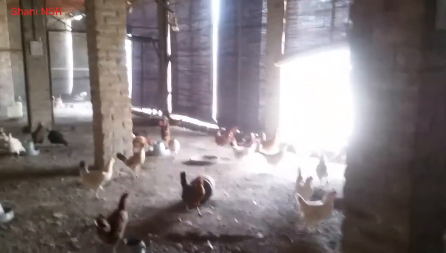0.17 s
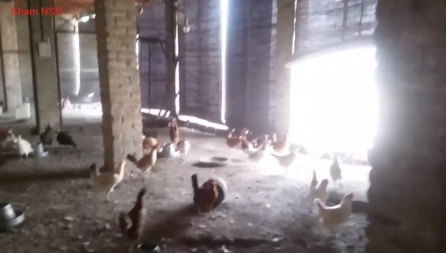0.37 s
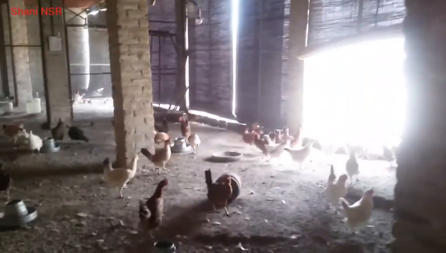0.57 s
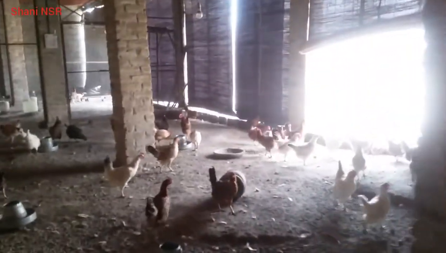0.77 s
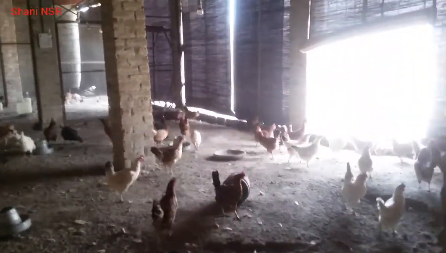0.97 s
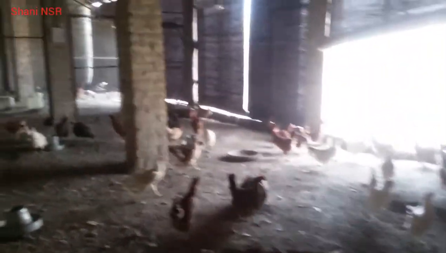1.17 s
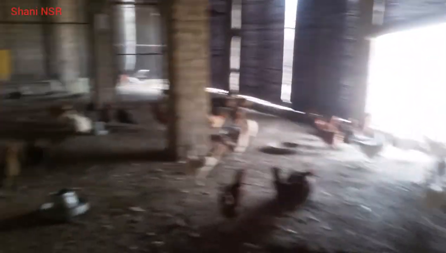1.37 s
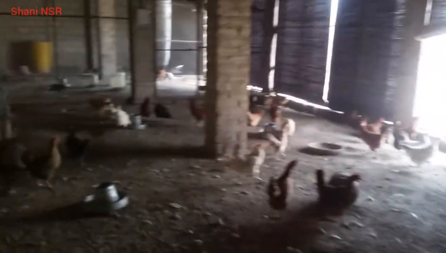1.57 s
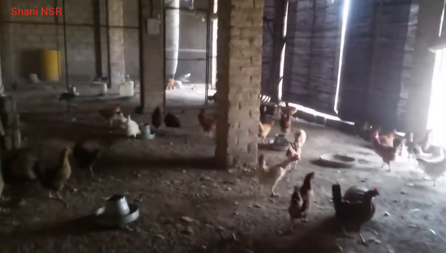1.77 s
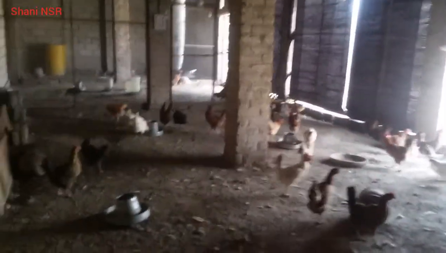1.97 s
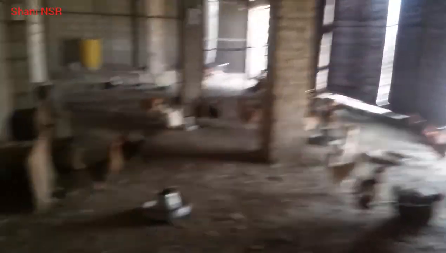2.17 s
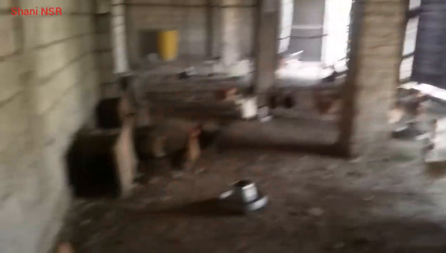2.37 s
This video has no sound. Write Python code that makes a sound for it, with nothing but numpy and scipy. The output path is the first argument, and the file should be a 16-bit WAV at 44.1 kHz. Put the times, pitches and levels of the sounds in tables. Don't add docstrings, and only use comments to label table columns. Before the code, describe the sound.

Hens cluck in short bunches and croon softly at a distance in an echoing brick shed, with faint pecks and low fan hum; then a close hen squawks, wings thump, and a second squawk is cut off.

```python
import sys
import numpy as np
from scipy import signal
from scipy.fft import rfft, irfft
from scipy.io import wavfile
from scipy.ndimage import uniform_filter1d

SR = 44100
rng = np.random.default_rng(int(sys.argv[2]) if len(sys.argv) > 2 else 0)


def amplitude_ratio(level_db):
    exponent = np.asarray(level_db, float) / 20
    return 10 ** exponent


def store_wav(level_fs):
    pcm = np.round(np.clip(np.atleast_2d(level_fs), -1, 1) * 32767)
    wavfile.write(sys.argv[1], SR, pcm.T.astype(np.int16))


N = 107207
PORT_LAG_S = 0.00017
FAR_T60_S = 0.33


def curve(table):
    p = np.array(table, float)
    return amplitude_ratio(np.interp(np.log(np.fft.rfftfreq(N, 1 / SR) + 1), np.log(p[:, 0] + 1), p[:, 1]))


def unit(x):
    return x / np.sqrt(np.mean(x ** 2))


def shaped(noise, table):
    return unit(irfft(rfft(noise) * curve(table), N))


def band(x, hz, width_hz):
    sos = signal.butter(2, [hz - width_hz / 2, hz + width_hz / 2], "band", fs=SR, output="sos")
    return signal.sosfilt(sos, x)


def walk(rate_hz):
    k = int(SR / rate_hz)
    steps = np.repeat(rng.standard_normal(N // k + 1), k)
    return unit(uniform_filter1d(uniform_filter1d(steps, k), k)[:N])


def stack(hz, partial_db):
    phase = 2 * np.pi * np.cumsum(hz) / SR
    return np.sqrt(2) * sum(amplitude_ratio(db) * np.sin((k + 1) * phase + k * k) for k, db in enumerate(partial_db))


def voiced(rows, partial_db, attack_s, wobble, flutter_db):
    out, t = np.zeros(N), np.arange(N) / SR
    drift, flutter = 1 + wobble * walk(60), amplitude_ratio(flutter_db * walk(34.4))
    for s, length, hz, end_hz, db in rows:
        on = slice(int(s * SR), int((s + length + attack_s) * SR))
        u = t[on] - s
        env = np.clip(np.minimum(u, length + attack_s - u) / attack_s, 0, 1) ** 2
        glide_hz = hz + (end_hz - hz) * u / length
        out[on] += amplitude_ratio(db) * env * flutter[on] * stack(glide_hz * drift[on], partial_db)
    return out


def shed(x, wet_db, lag_s, t60_s, slap=1):
    slap_s, slap_db, t60_high_s = 0.047, -15, 0.5
    t = np.arange(SR) / SR
    noise = rng.standard_normal((2, SR))
    noise += 1.21 * signal.sosfilt(signal.butter(2, 900, fs=SR, output="sos"), noise.sum(0))
    low = signal.sosfilt(signal.butter(1, 2500, fs=SR, output="sos"), noise)
    tail = low * amplitude_ratio(-60 * t / t60_s) + (noise - low) * amplitude_ratio(-60 * t / min(t60_high_s, t60_s))
    tail = tail * np.clip(t / 0.012, 0, 1)
    ir = amplitude_ratio(wet_db) * tail / np.sqrt(np.sum(amplitude_ratio(-120 * t / t60_s)))
    lag = int(round(lag_s * SR))
    ir[0, max(lag, 0)] += 1
    ir[1, max(-lag, 0)] += 1
    ir[:, int(slap_s * SR)] += slap * amplitude_ratio(slap_db)
    return signal.fftconvolve(x[None], ir, axes=1)[:, :N]


# f/Hz, density/(dB per Hz)
RUMBLE = [(18, -29.5), (30, -5), (129, 6), (717, -6), (1580, -12.5), (2250, -6.5), (3550, -16),
          (4800, -33.5), (6500, -50), (9000, -76), (19800, -120)]


def rumble():
    shared = rng.standard_normal(N)
    white = np.array([np.roll(shared, int(PORT_LAG_S * SR)), shared]) + 0.55 * rng.standard_normal((2, N))
    return amplitude_ratio(-49.5) * shaped(white, RUMBLE) * amplitude_ratio(0.59 * walk(13))


# f/Hz, level/dB
FAN_LINES = [(60, -60.5), (120, -83), (527, -61.5)]


def fan():
    t = np.arange(N) / SR
    return sum(amplitude_ratio(db) * np.sqrt(2) * np.sin(2 * np.pi * hz * t) for hz, db in FAN_LINES)


# f/Hz, density/(dB per Hz)
HISS = [(5000, -56), (8500, -25), (10700, -12.5), (12100, 1.5), (14100, 7), (15700, 8.5)]


def hiss():
    noise = shaped(rng.standard_normal((2, N)), [(7000, -57)] + list(HISS))
    return amplitude_ratio(-63) * noise * amplitude_ratio(1.3 * walk(3.5) + 1.1 * walk(18))


# t/s, length/s
CHATTER_SPANS_S = [
    (.36, .2),
    (.58, .22),
    (.86, .2),
    (1.13, .2),
    (1.40, .14),
    (1.56, .12),
    (1.70, .25),
]
CHATTER_DB = [-73, -60.5, -56, -56, -59, -55.5, -59.5]
CHATTER_HZ = [2544, 3234, 1737]
CHATTER_WIDTH_HZ = [570, 520, 390]


def chatter():
    t, flicker_db, edge_s = np.arange(N) / SR, 2, 0.04
    env = sum(amplitude_ratio(db) * np.clip(np.minimum(t - s, s + length - t) / edge_s, 0, 1)
              for (s, length), db in zip(CHATTER_SPANS_S, CHATTER_DB))
    return env * sum(amplitude_ratio(flicker_db * walk(31.0)) * unit(band(rng.standard_normal(N), f, w))
                     for f, w in zip(CHATTER_HZ, CHATTER_WIDTH_HZ))


# t/s, length/s, first f/Hz, last f/Hz, level/dB
HIGH_CROONS = [(.03, .06, 1033, 1026, -54), (.19, 0.04, 798, 812, -56), (.26, 0.04, 845, 830, -52),
               (.24, .09, 980, 1000, -54), (.37, 0.25, 1040, 1070, -48), (.62, 0.083, 1000, 1020, -45),
               (.64, .06, 920, 930, -50), (.73, 0.125, 1070, 1060, -48), (.77, 0.054, 920, 960, -50),
               (.97, 0.15, 1690, 1864, -55), (1.04, 0.063, 920, 960, -47), (1.055, .055, 1170, 1090, -44),
               (.94, .07, 950, 900, -55), (1.2, .07, 920, 900, -58), (1.8, .08, 860, 870, -61)]
HIGH_PARTIALS_DB = [2.5, -17]


def high_croons():
    return voiced(HIGH_CROONS, HIGH_PARTIALS_DB, attack_s=0.0017, wobble=0.03, flutter_db=np.sqrt(2))


# t/s, length/s, first f/Hz, last f/Hz, level/dB
MID_CROONS = [
    (.885, 0.023, 598, 595, -41.5),
    (.905, 0.035, 780, 799, -34),
    (.96, 0.03, 786, 802, -34.5),
    (1.01, 0.051, 807, 763.4, -35.5),
]
MID_PARTIALS_DB = [0, -10, -36]


def mid_croons():
    return voiced(MID_CROONS, MID_PARTIALS_DB, attack_s=0.01, wobble=0.0058, flutter_db=1.1)


# t/s, length/s, first f/Hz, last f/Hz, level/dB
LOW_CROONS = [
    (.22, 0.4, 334.8, 341.7, -53),
    (.58, 0.217, 334, 363.7, -47),
    (.83, 0.042, 368, 381.3, -38),
    (.905, 0.14, 427.6, 448, -43),
    (1.10, 0.067, 396.3, 407.2, -37),
    (1.22, 0.036, 421, 429, -38),
    (1.26, 0.063, 408, 397.6, -44.5),
]
LOW_PARTIALS_DB = [-6.5, -22.5, -14.5, -16.5]


def low_croons():
    return voiced(LOW_CROONS, LOW_PARTIALS_DB, attack_s=0.0057, wobble=0.007, flutter_db=2.2)


# t/s, length/s, f/Hz, level/dB
CLUCKS = [(0.073, 0.12, 634, -50), (0.146, 0.024, 592.3, -28), (0.152, 0.033, 714.6, -38.5),
          (0.3123, 0.017, 637, -25), (0.331, 0.0096, 662, -22), (0.347, .012, 639, -31),
          (0.366, .018, 642, -38), (0.436, 0.041, 807, -36), (0.469, 0.017, 751, -25.5),
          (0.541, 0.016, 742, -26.5), (0.571, 0.022, 731.5, -34.5), (0.611, 0.064, 756, -36),
          (0.645, 0.016, 748, -29), (1.269, 0.023, 591, -47.5)]
# f/Hz, level/dB
CLUCK_THROAT = [(550, -14), (650, -14), (800, -11), (1150, 0), (1500, 0), (1750, -13), (1900, -11),
                (2200, -30), (3200, -40)]


def clucks():
    throat_hz, throat_db = np.array(CLUCK_THROAT).T
    out = np.zeros(N)
    for s, length, hz, db in CLUCKS:
        partial_db = np.interp(hz * np.arange(1, 5), throat_hz, throat_db)
        out += voiced([(s, length, hz, hz * (1 - 0.023), db)], partial_db, 0.0075, 0.0094, 0.38)
    return out


PECK_TIMES_S = [
    .899,
    1.09,
    1.64,
    1.75,
]
PECKS_DB = [-31, -39, -34, -41]


def pecks():
    t, clicks = np.arange(N) / SR, np.zeros(N)
    for s, db in zip(PECK_TIMES_S, PECKS_DB):
        clicks -= amplitude_ratio(db) * np.exp(-((t - s) / 0.00016) ** 2)
    cracks = band(clicks, 2500, width_hz=3600) * 2.68
    return shed(cracks, 0, PORT_LAG_S, t60_s=0.12, slap=0)


THUMP_TIMES_S = [
    2.156,
    2.181,
    2.204,
    2.272,
]
THUMPS_DB = [-25, -23, -27.5, -23]


def wing_thumps():
    t, puffs = np.arange(N) / SR, np.zeros(N)
    puff_hz, puff_s, left_db = 300, 0.0017, -12
    for s, db in zip(THUMP_TIMES_S, THUMPS_DB):
        puffs += amplitude_ratio(db) * np.exp(-((t - s) / puff_s) ** 2) * np.cos(2 * np.pi * puff_hz * (t - s))
    return puffs * amplitude_ratio(np.array([[left_db], [0]]))


# f/Hz, density/(dB per Hz)
STRAIN = [(4000, -37.5), (6000, -11.5), (8000, -32), (10000, -7), (13000, -3), (15500, -7.5)]


def strain():
    t, peak_s, length_s = np.arange(N) / SR, 2.08, 0.046
    env = amplitude_ratio(-55.5) * np.exp(-((t - peak_s) / length_s) ** 2)
    return env * shaped(rng.standard_normal(N), STRAIN)


BEAK_HZ = [1065, 1926, 1480, 625]
BEAK_WIDTH_HZ = [117, 210, 168.2, 146]
RASP_DB = [-4, -1.5, -10.5, -19.5]
# f/Hz, density/(dB per Hz)
BREATH = [(250, -35.5), (550, -15.5), (1400, -3), (2200, -15.5), (3200, -24), (5000, -36), (7200, -50),
          (9000, -79.5)]


def squawk(rows, partial_db, rasp_share):
    rattle_hz, rattle_depth, quaver, jitter = 71.75, 0.94, 0.004, 0.062
    upper_fade_db, breath_db, breath_build_s = 44, 2.5, 0.07
    t, p = np.arange(N) / SR, np.array(rows).T
    start_s, end_s = p[0, 0], p[0, -1]
    hz, db, rough = (np.interp(t, p[0], c) for c in p[1:])
    rattle = np.cos(2 * np.pi * np.cumsum(rattle_hz * (1 + 0.1026 * walk(30))) / SR)
    fading_db = []
    for k, g in enumerate(partial_db):
        flutter_db = 3 if k > 1 else 2.5
        fading_db.append(g - upper_fade_db * rough * (k > 2) + flutter_db * walk(70))
    shaky_hz = hz * (1 + (quaver + jitter * rough ** 2) * walk(250))
    voice = stack(shaky_hz, fading_db) * (1 + rattle_depth * rough * rattle)
    rasp = sum(amplitude_ratio(g) * unit(band(rng.standard_normal(N), f, w))
               for f, w, g in zip(BEAK_HZ, BEAK_WIDTH_HZ, RASP_DB))
    breath = amplitude_ratio(breath_db) * shaped(rng.standard_normal(N), BREATH) * (1 + 0.21 * rattle)
    rasp += breath * np.clip((t - start_s) / breath_build_s, 0, 1)
    gate = (t > start_s) & (t < end_s)
    return amplitude_ratio(db) * gate * (voice + (rasp_share + np.abs(rough)) * rasp)


# t/s, f/Hz, level/dB, roughness/0-1
SQUAWK_1 = [
    (1.986, 671, -52, 0),
    (1.998, 692.2, -26, 0.25),
    (2.018, 715, -18.5, 0.22),
    (2.04, 742.3, -28, 0.31),
    (2.074, 770.3, -19.5, 0.29),
    (2.10, 687, -23.5, 0.69),
    (2.124, 679.9, -20, 0.42),
    (2.165, 677.7, -29.5, 0.55),
    (2.2, 670, -52, 0.8),
]
SQUAWK_1_PARTIALS_DB = [-6.5, 6, -17.5, -4.5, -26, -24.5, -32, -44.5, -40.5, -71.5]
# t/s, length/s, first f/Hz, last f/Hz, level/dB
ONSET = [
    (1.987, .018, 995, 1000, -22),
]
ONSET_PARTIALS_DB = [-10, 0]
# t/s, length/s, first f/Hz, last f/Hz, level/dB
UNDERTONE = [
    (1.995, .035, 585, 610, -37),
]


def first_squawk():
    voice = strain() + squawk(SQUAWK_1, SQUAWK_1_PARTIALS_DB, rasp_share=0.025)
    voice += voiced(ONSET, ONSET_PARTIALS_DB, 0.002, 0.0068, 0.94)
    return voice + voiced(UNDERTONE, [0], 0.0055, 0.014, 4.6)


# t/s, f/Hz, level/dB, roughness/0-1
SQUAWK_2 = [
    (2.285, 600, -60, .6),
    (2.303, 635, -25, .8),
    (2.325, 645, -22, .75),
    (2.338, 800, -21, .28),
    (2.36, 809, -22, .1),
    (2.40, 810, -24, .16),
    (2.44, 807, -24, .18),
]
SQUAWK_2_PARTIALS_DB = [-1, -8, -24, -20, -14, -10, -34, -29, -43, -60, -60, -44, -42, -56, -50, -48, -38,
                        -41, -50]


def second_squawk():
    return squawk(SQUAWK_2, SQUAWK_2_PARTIALS_DB, rasp_share=0.26)


def scene():
    background = rumble() + hiss() + fan()
    far = shed(high_croons() + chatter(), 0.91, PORT_LAG_S, FAR_T60_S, slap=0)
    far += shed(mid_croons() + low_croons(), -4, 0.0003, FAR_T60_S, slap=0)
    far += shed(clucks(), -8, PORT_LAG_S, FAR_T60_S)
    near = shed(first_squawk(), 0, -0.00021, t60_s=0.6)
    near += shed(second_squawk(), -5, -0.00003, t60_s=0.6)
    return background + far + pecks() + wing_thumps() + near


def top_cut(x):
    return signal.sosfilt(signal.butter(12, 16270, fs=SR, output="sos"), x)


# f/Hz, level/dB
PORTS = [(60, -1.5), (130, -4.5), (300, -4.5), (700, -1.5), (1300, -2), (2400, -6), (4400, -3.5), (8000, 6),
         (15000, 10)]


def record(dry):
    loud = uniform_filter1d(np.abs(dry), size=400)
    grit = shaped(rng.standard_normal((2, N)), [(7000, -42.0)] + list(HISS))
    x = dry + amplitude_ratio(-46) * loud * grit
    x = signal.sosfilt(signal.ellip(10, 0.2, 60, 15800, fs=SR, output="sos"), x)
    tilt = np.sqrt(curve(PORTS))
    ports = np.roll(irfft(np.array([tilt, 1 / tilt]), N), N // 2, axis=1)
    x = signal.fftconvolve(x, ports, axes=1)[:, N // 2:N // 2 + N]
    return top_cut(x)


dry = scene()
out = record(dry)
store_wav(out)
```